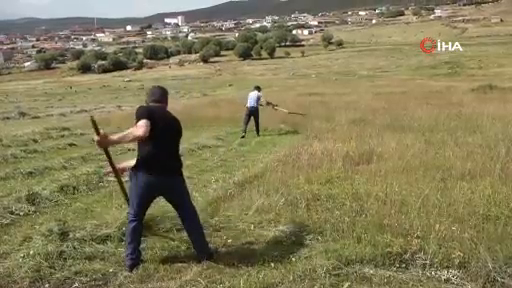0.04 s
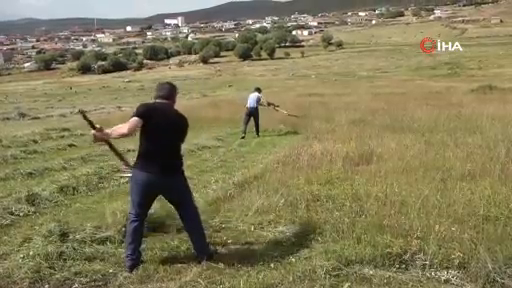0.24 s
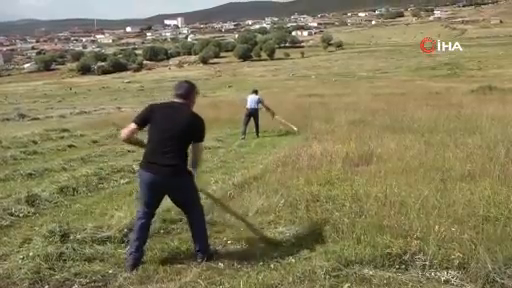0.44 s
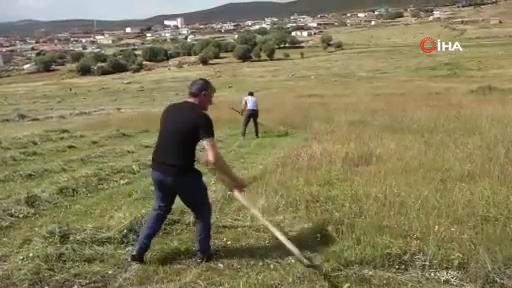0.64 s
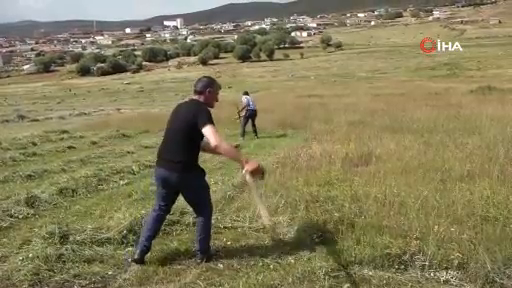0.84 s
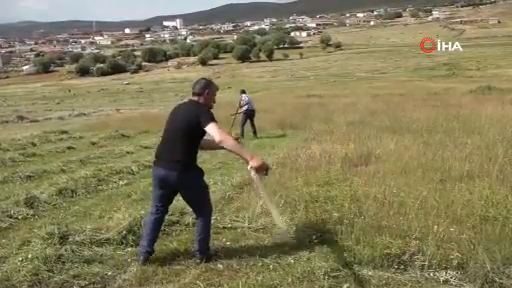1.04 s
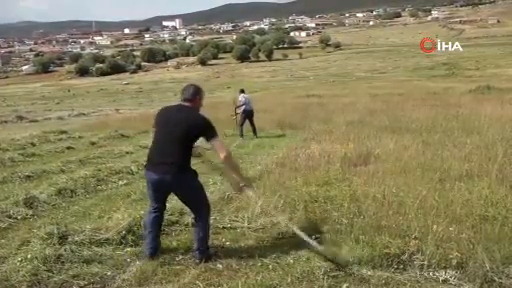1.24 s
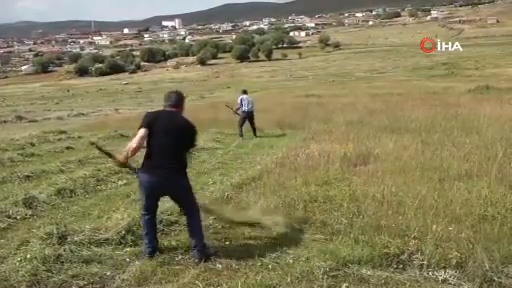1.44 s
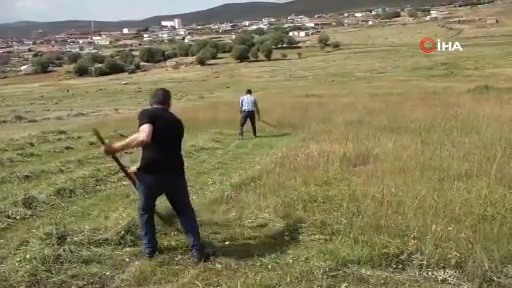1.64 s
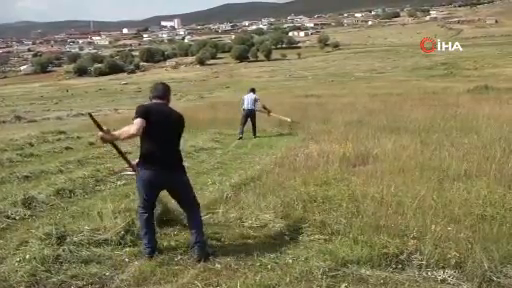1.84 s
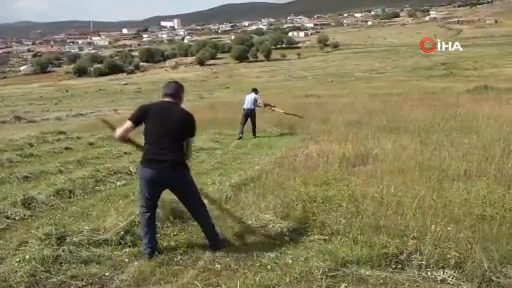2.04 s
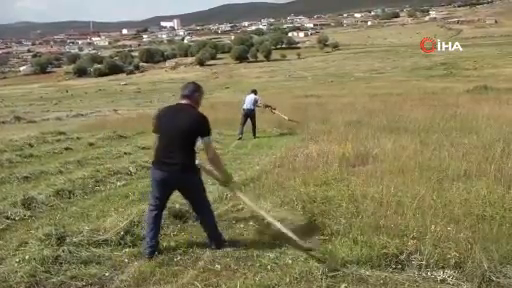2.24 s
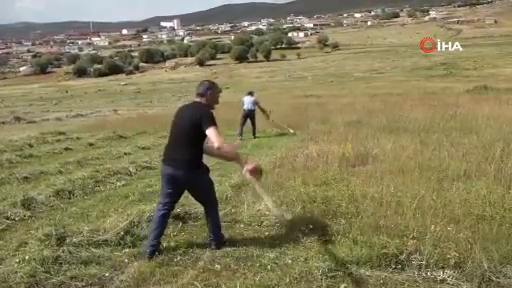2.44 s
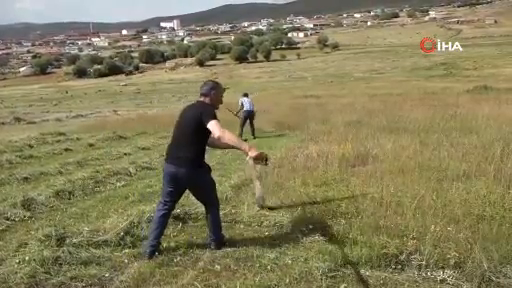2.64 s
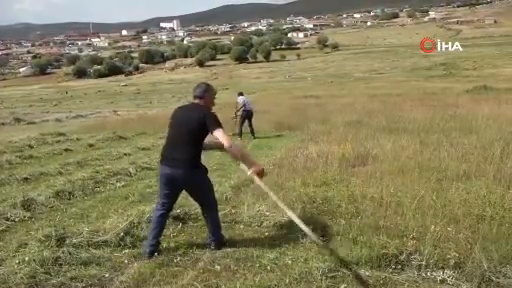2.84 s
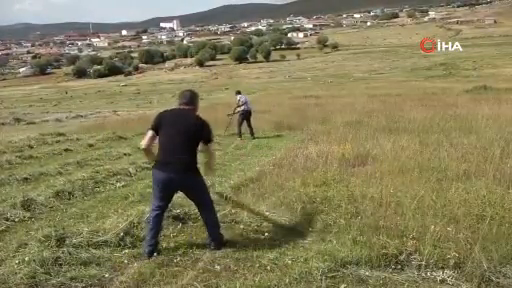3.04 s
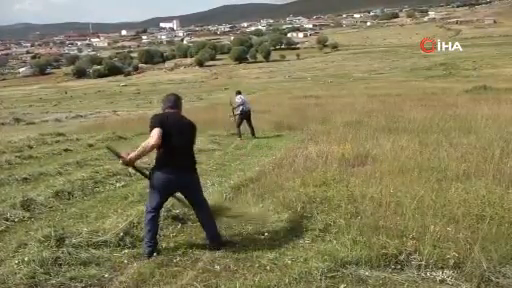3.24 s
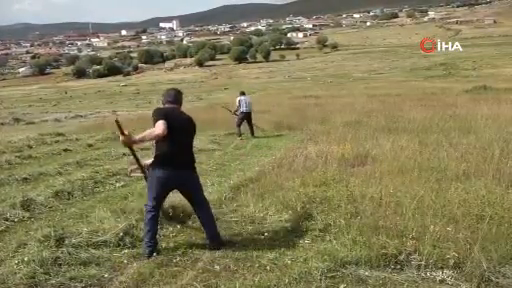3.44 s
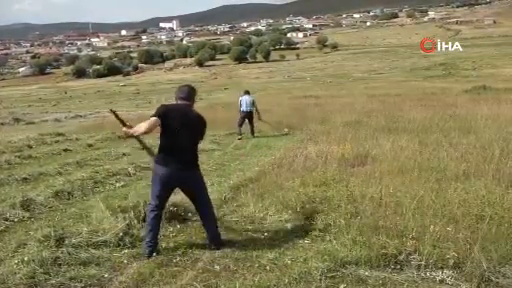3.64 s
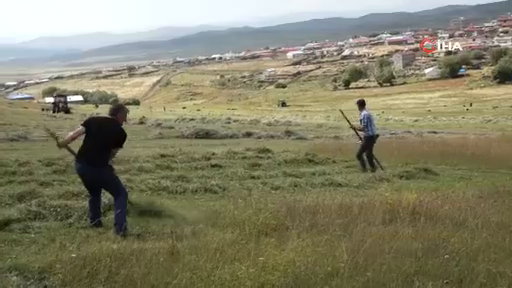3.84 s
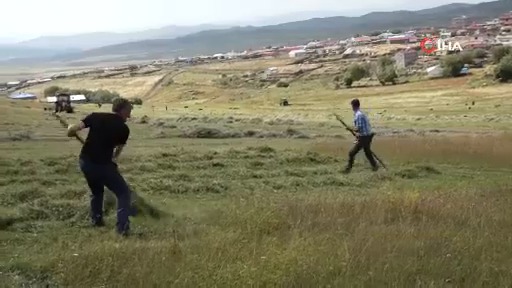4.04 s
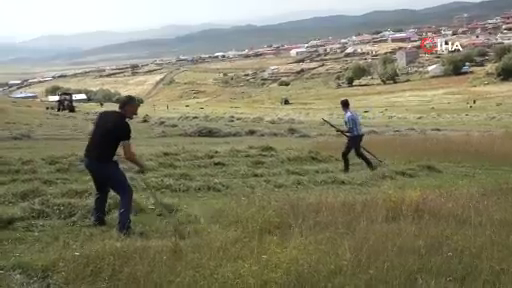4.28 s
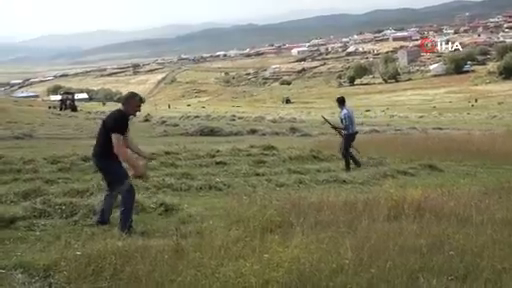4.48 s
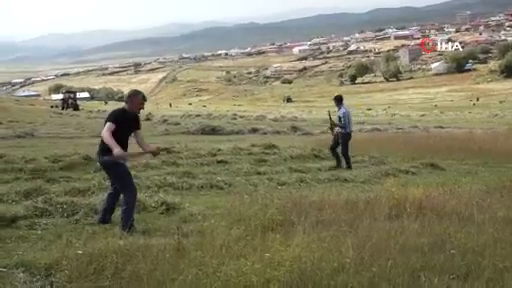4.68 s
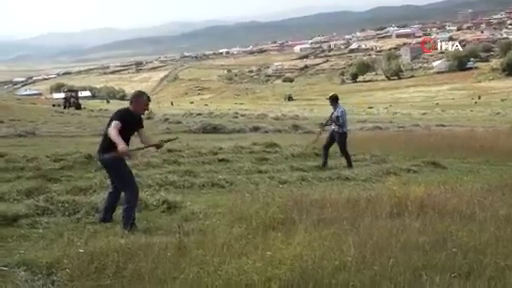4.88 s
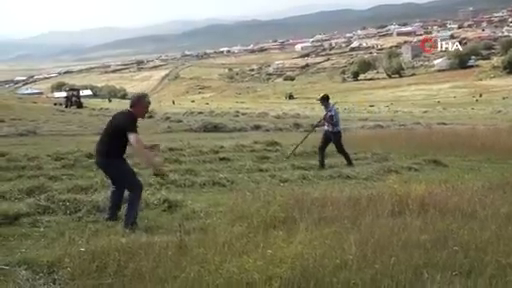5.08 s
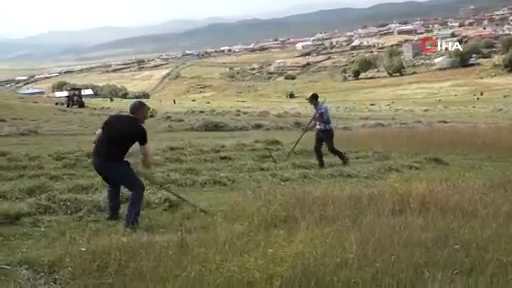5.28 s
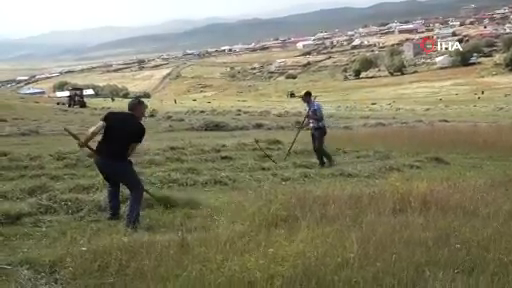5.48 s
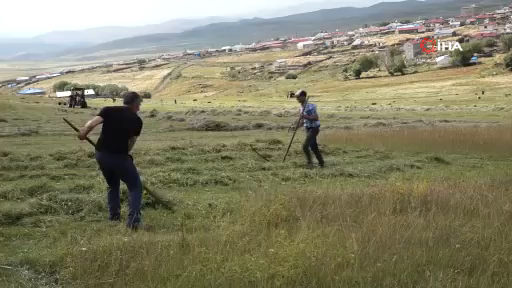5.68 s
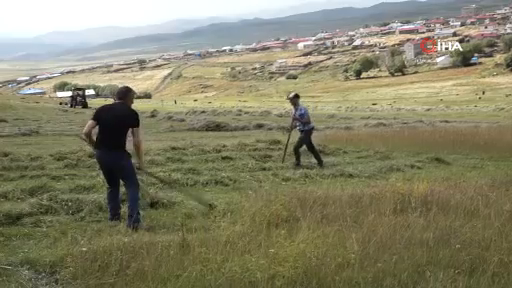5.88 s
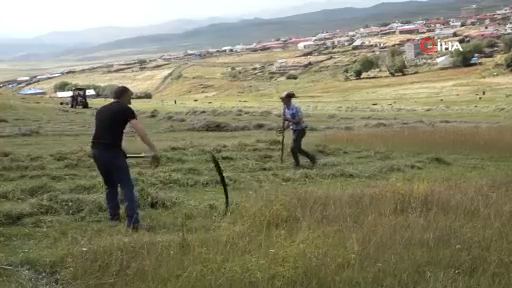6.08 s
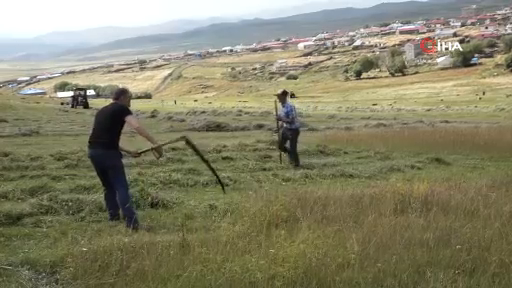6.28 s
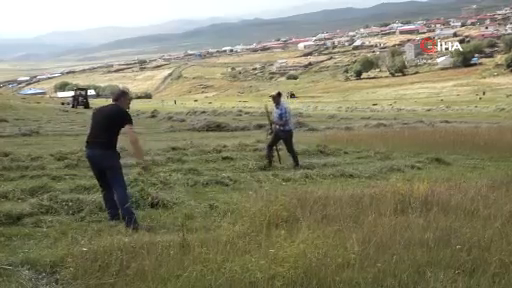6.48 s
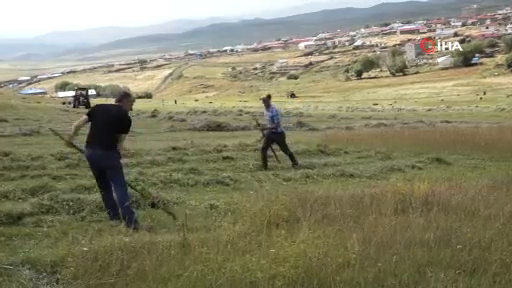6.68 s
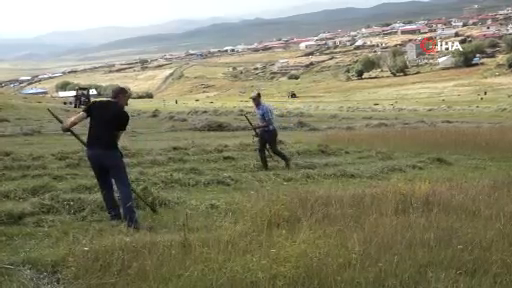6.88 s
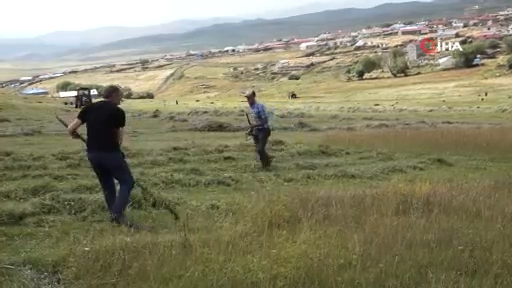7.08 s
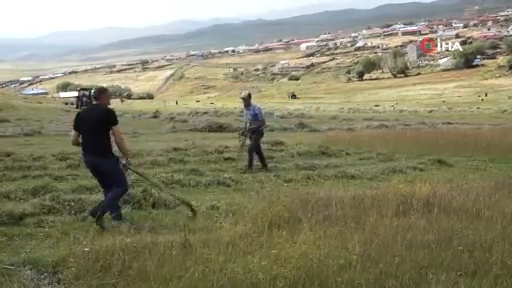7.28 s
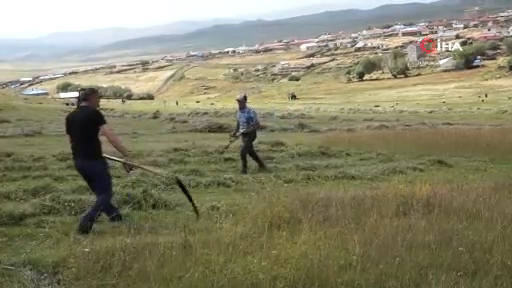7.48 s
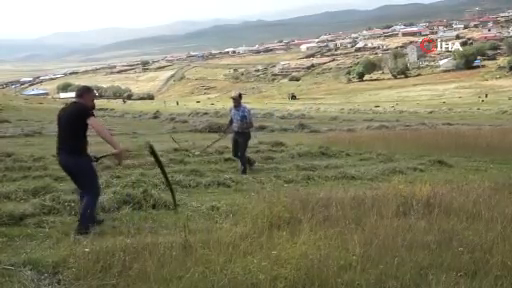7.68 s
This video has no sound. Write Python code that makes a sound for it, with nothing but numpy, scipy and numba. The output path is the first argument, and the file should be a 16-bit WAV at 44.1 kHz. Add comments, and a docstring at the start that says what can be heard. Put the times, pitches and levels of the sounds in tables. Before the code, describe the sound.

Crisp, hissing scythe strokes cut grass a few metres away while a far-off tractor engine chugs steadily.

```python
"""Scythes in a meadow

Two mowers cut dry grass a few metres away. Stems hiss and snap at the blade, the cut swath slumps,
the steel rings faintly and a brief squeak falls at the end. A tractor throbs far down the slope and
light wind buffets the microphone. Midway the listener takes a new stand."""
import sys
import numpy as np
from scipy import signal
from scipy.fft import rfft, irfft
from scipy.io import wavfile
from scipy.ndimage import uniform_filter1d
from numba import njit

SR = 44100
rng = np.random.default_rng(int(sys.argv[2]) if len(sys.argv) > 2 else 0)


def unload_audio(sound):
    """Save the sound as a 16-bit wav file, at the path given as the first command line argument."""
    columns = np.transpose(np.atleast_2d(sound))
    # keep every value between -1 and 1, then stretch to whole-number steps
    steps = np.round(np.clip(columns, -1, 1) * 32767)
    wavfile.write(sys.argv[1], SR, steps.astype(np.int16))


N = 340452
T = np.arange(N) / SR
NEW_STAND_S = 3.775
BITE_FALL_S, TRAIL_FALL_S = 0.12, 0.18  # time to fall 20 dB
BITE_BEND = 1.43  # exponent that rounds the top of the rise

# Spectra of the background hiss, breeze and grass rustle as heard, with the highest treble cut away.
# Each row: frequency in Hz, relative spectral density in dB.
BACKGROUND_SPECTRUM = [(120, -15.5), (200, -7), (307, -38), (490, -10), (653, -20.5), (767, -12),
                       (918, -17), (1460, -18.5), (1750, -25.5), (2500, -24), (5710, -25), (8000, -30),
                       (11900, -32.5), (13000, -57), (14500, -84)]
BREEZE_SPECTRUM = [(8.8, -30), (15, -4), (107, -5), (201, -11), (304, -27.5), (400, -20.5), (520, -72)]
RUSTLE_SPECTRUM = [(1500, -12), (1900, -11), (2570, -3.5), (3000, -4), (5000, 2), (6600, 4), (8400, 4),
                   (11000, -1), (13000, -8.5), (15000, -49)]
# Gusts on the microphone. Each row: start in seconds, hold in seconds, level in dB, centre in Hz.
WIND_GUSTS = [(0.82, 0.049, -40.5, 91), (0.96, .06, -36.5, 65.6), (1.076, 0.021, -35.5, 68.5),
              (1.194, .02, -50, 58.7), (1.275, 0.011, -36, 44.7), (1.304, 0.023, -39.5, 71),
              (1.6, 0.07, -44.5, 50.4), (2.148, 0.022, -45, 50), (6.747, 0.26, -39, 104),
              (7.12, 0.025, -40.5, 130), (7.352, 0.018, -43, 115.9), (7.578, 0.095, -41.5, 136)]
# The engine's course. Each row: time in seconds, firing rate in Hz, exhaust gain in dB, clatter in dB.
ENGINE_COURSE = [(0, 34, -50.5, -72), (2, 33.57, -47.5, -66.5), (3.76, 33.97, -50, -63.5),
                 (3.8, 31.03, -48, -67), (4.35, 31.1, -47, -56), (4.65, 30.39, -47, -55.5),
                 (5.15, 31.46, -46.5, -55), (5.95, 31.58, -47.5, -56), (6.5, 31.93, -45, -56),
                 (6.8, 32.61, -51, -56.5), (7.72, 32.56, -44.5, -63)]
# Exhaust harmonics. Each row: multiple of the firing rate, gain in dB at the first stand, at the second.
EXHAUST_HARMONICS = [(1, 2.5, -1), (2, -15, 1.5), (3, 1, 3), (4, -22, 0.5), (5, -7.5, -11.5),
                     (6, -11.5, -14), (7, -15.5, -42), (8, -18.5, -19.5)]
# Resonances of the tractor's bonnet, the blade, the swath and the microphone's housing.
# Each row: frequency in Hz, bandwidth in Hz, gain in dB.
BONNET_MODES = [(490, 170, -1.5), (821, 99, 2), (1342, 130, 3.5), (2000, 370, 2), (2495, 480, 5),
                (3340, 520, 2.5), (4300, 900, 1)]
BLADE_MODES = [(2120, 400, 4.5), (2580, 620, 2), (3000, 360, 3.5), (4500, 1800, 10.5)]
SWATH_BANDS = [(505, 304, 8), (810, 324, 7), (1130, 240, -1.5)]
HOUSING_MODES = [(3110, 180, -14), (4500, 490, -13), (5790, 250, -10), (6500, 270, -8.5), (8280, 285, -4.5)]
# The squeak's glide. Each row: time in seconds, fundamental in Hz, gain in dB.
SQUEAK_GLIDE = [(7.674, 594, -83), (7.68, 573, -50), (7.692, 530, -63), (7.705, 424, -51), (7.72, 392, -59)]
# The blade dragging over stubble. Each row: start in seconds, length in seconds, level in dB,
# band centre in Hz at the start and at the end.
BLADE_DRAGS = [(0.768, 0.05, -45, 4500, 3500), (0.782, 0.087, -46.5, 3220, 1600),
               (1.358, 0.25, -43, 4120, 1650), (1.38, 0.19, -31.5, 9200, 6900),
               (1.407, 0.04, -37, 4500, 2700), (1.508, 0.032, -33.5, 5500, 2700),
               (1.564, 0.09, -45, 1870, 690), (2.72, 0.07, -42.5, 4500, 2000),
               (3.015, 0.29, -42, 3600, 2170), (3.09, 0.024, -38, 4230, 3100),
               (3.1, 0.13, -32.5, 9300, 7100), (3.174, 0.084, -45, 2100, 1700),
               (3.195, 0.071, -35, 5500, 3700), (3.776, 0.045, -49, 3000, 3100),
               (5.3, 0.22, -43, 4030, 3000), (5.561, 0.076, -48, 4800, 4900),
               (6.736, 0.08, -50, 4200, 2700)]
# Single stems breaking. Each row: start in seconds, peak in dB, centre in Hz.
STEM_SNAPS = [(0.394, -22.5, 9100), (0.674, -30, 8370), (0.7, -34, 8200), (0.748, -23.5, 5620),
              (0.8823, -27, 6500), (1.416, -28, 4150), (1.4547, -15, 7500), (1.494, -18, 6560),
              (1.497, -13.5, 6000), (1.5, -19, 5570), (1.502, -27, 6510), (2.285, -23.5, 6500),
              (2.3381, -28, 10300), (2.4851, -29, 7200), (2.5527, -32, 8000), (2.6626, -29, 6000),
              (3.1032, -26, 4500), (3.1552, -21, 6500), (3.239, -27, 4800), (3.7885, -36, 6000),
              (5.26, -24, 6890), (5.3385, -27, 7190), (5.511, -28, 6200), (6.748, -33, 5500),
              (6.792, -30.5, 4300), (6.831, -35, 4830)]
# Back swings, far cuts and feet. Each row: start in seconds, hold in seconds, level in dB,
# rise and fall in seconds per 20 dB, spectral tilt in dB per octave.
LIGHT_RUSTLES = [(0, 0.069, -37.5, 0.046, 0.17, 3.5), (.332, .005, -41.5, 0.091, 0.058, 5),
                 (.398, .003, -37.5, 0.041, 0.019, 6), (.43, 0.27, -41, 0.11, 0.24, 2.5),
                 (.77, 0.04, -40.5, 0.04, 0.2, 0), (.85, 0.041, -39.5, 0.12, 0.12, 2.5),
                 (1.0, 0.16, -56, .1, 0.26, 3), (2.04, 0.25, -48, 0.21, .1, 3.5),
                 (2.23, 0.098, -41, 0.21, 0.088, 2.5), (2.489, 0.0039, -48, 0.0073, 0.11, -3),
                 (2.551, .004, -40, 0.014, 0.021, 2.5), (2.57, 0.052, -53.5, 0.23, 0.26, 14),
                 (2.73, 0.026, -41.5, 0.31, 0.28, -1.5), (3.63, 0.077, -46, 0.2, 0.33, 2),
                 (3.79, .005, -37.5, 0.015, 0.096, 0), (3.85, 0.056, -47, .05, 0.23, 0),
                 (4.36, 0.039, -50.5, 0.69, 0.37, 3), (4.45, .005, -45, 0.16, 0.14, -0.5),
                 (4.62, 0.53, -56, 0.13, 0.097, -12), (5.87, 0.01, -53, 0.6, 0.32, -1.5),
                 (6.09, .005, -51.5, 0.12, 0.046, -4), (6.4, 0.16, -59.5, 0.055, 0.16, -10),
                 (6.74, 0.068, -42, 0.014, 0.062, -1), (6.86, .02, -47.5, 0.055, 0.1, 2),
                 (7.13, 0.0049, -51, 0.23, 0.14, 1), (7.34, 0.012, -55.5, 0.28, 0.034, -4)]
# Full strokes. Each row: the bite's start and hold in seconds, level and change along the hold in dB,
# and last 20 dB of rise in seconds; the follow-through's hold in seconds and level in dB;
# the swath's start and hold in seconds, level and change along the hold in dB.
STROKES = [(1.375, 0.15, -29.5, -2.5, 0.051, 0.18, -31.5, 1.5, 0.14, -42, -3),
           (3.094, 0.14, -29.5, -1, 0.098, 0.23, -35, 3.168, .21, -43, -6.5),
           (5.268, .11, -38.5, 5.5, 0.12, 0.19, -34.5, 5.33, 0.14, -48.5, -5.5)]


def undb(db):
    """Amplitude ratio of a level in dB."""
    return 10 ** (np.asarray(db) / 20)


def level(x, db):
    """Scaling to an rms level in dB."""
    return x * undb(db) / np.sqrt(np.mean(x ** 2))


def curves(table):
    """Linear interpolation of each column over the times in the first."""
    times, *columns = np.transpose(table)
    return [np.interp(T, times, column) for column in columns]


def spectrum_db(points, hz):
    """Interpolation of a spectrum on a logarithmic frequency axis."""
    freqs, db = np.transpose(points)
    return np.interp(np.log(hz), np.log(freqs), db)


@njit
def state_variable(x, tuning, damping):
    """Two integrators in a loop form a damped resonator with unit gain at its centre."""
    y, band, low = np.empty(len(x)), 0., 0.
    for i in range(len(x)):
        g = tuning[i]
        v = (band + g * (x[i] + 1e-18 - low)) / (1 + g * (g + damping))
        band, low, y[i] = 2 * v - band, low + 2 * g * v, damping * v
    return y


def bandpass(x, hz, width, stages=1):
    """Resonators in cascade; the centre may glide, and each stage's width is a fraction of it."""
    tuning = np.tan(np.pi * hz / SR) + np.zeros(len(x))
    for _ in range(stages):
        x = state_variable(1. * x, tuning, 1. * width)
    return x


def ring(x, modes):
    """Superposition of modes, each filtered twice to deepen the valleys between them."""
    return sum(undb(db) * bandpass(bandpass(x, hz, width / hz), hz, 1.5 * width / hz) / np.sqrt(width)
               for hz, width, db in modes)


def coloured_noise(points):
    """White noise weighted by a spectrum; rms 1."""
    hz = np.maximum(np.fft.rfftfreq(N, 1 / SR), 1)
    return level(irfft(rfft(rng.standard_normal(N)) * undb(spectrum_db(points, hz)), N), 0)


def waver(rate):
    """Random modulation: rate steps a second, smoothed twice; spread near 1."""
    span = int(SR / rate)
    steps = np.repeat(rng.standard_normal(N // span + 1), span)
    return 1.3 * uniform_filter1d(uniform_filter1d(steps, span), span)[:N]


def crackle(rate, spread_db):
    """Shot noise: on average rate impulses a second, of uneven size; rms 1."""
    hits = (rng.random(N) < rate / SR) * rng.standard_normal(N)
    return level(hits * undb(spread_db * np.minimum(rng.exponential(size=N), 3)), 0)


def swell(start, hold, db, rise, fall, change_db=0, bend=1):
    """Power envelope that reaches db at start, holds, then decays; rise and fall each span 20 dB."""
    along = np.clip((T - start) / max(hold, 1e-3), 0, 1)
    rise_db = 20 * (np.maximum(start - T, 0) / rise) ** bend
    fall_db = 20 * np.maximum(T - start - hold, 0) / fall
    return undb(2 * (db + change_db * along - rise_db - fall_db))


def stereo(mid, side, side_db):
    """Sum and difference give the left and right channels."""
    return mid + undb(side_db) * side * np.array([[1], [-1]])


def meadow():
    """The distant background hiss is broadband noise, partly correlated between the channels."""
    db = np.where(T > NEW_STAND_S, -54.5, -56) + 0.7 * waver(2.64)
    mid, side = (coloured_noise(BACKGROUND_SPECTRUM) for _ in range(2))
    return undb(db) * stereo(mid, side, -10.5)


def wind(breeze_db=-48.5, lull_db=-51.5, lull_hz=104):
    """Turbulence presses almost equally on both microphone ports; each gust has its own low band."""
    gusts = [(swell(start, hold, db, rise=0.12, fall=0.19), hz) for start, hold, db, hz in WIND_GUSTS]
    gusts.append((undb(2 * lull_db), lull_hz))
    power = sum(p for p, _ in gusts)
    centre = sum(p * hz for p, hz in gusts) / power
    eddies = bandpass(rng.standard_normal(N), centre, 1.58, stages=3) / np.sqrt(centre)
    breeze = undb(breeze_db + 0.49 * waver(8.6)) * coloured_noise(BREEZE_SPECTRUM)
    buffeting = np.sqrt(power) * undb(1.1 * waver(30)) * level(eddies, 0)
    side = level(bandpass(rng.standard_normal(N), 135, 0.84), 0)
    return stereo(breeze + buffeting, side, -69.5)


def tractor(firing_s=3.795, lead_cycles=.13, gap_cycles=.17, scatter_db=2.5):
    """Periodic firing gives exhaust harmonics and twice a cycle knocks the bonnet into resonance."""
    hz, exhaust_db, clatter_db = curves(ENGINE_COURSE)
    cycles = np.cumsum(hz) / SR
    cycles -= cycles[int(firing_s * SR)]
    exhaust = 0
    for k, first_db, second_db in EXHAUST_HARMONICS:  # level and phase waver over the distance
        gain = undb(np.where(T > NEW_STAND_S, second_db, first_db) + 1.05 * waver(13))
        exhaust += gain * np.cos(2 * np.pi * k * cycles + 0.77 * waver(5.7))
    firing, since = np.divmod(cycles + lead_cycles, 1)
    second_knock = .6 * (since > gap_cycles) * np.exp(-(since - gap_cycles) / .2)
    knocks = .3 + np.exp(-since / .15) + second_knock
    tick = 11 * (np.diff(since, prepend=0) < 0)  # the first knock starts sharply
    strengths = undb(scatter_db * rng.uniform(-1, 1, (N // 1000, len(BONNET_MODES))))
    blows = strengths[(firing - firing[0]).astype(int)].T  # one strength per panel and firing
    mid = sum(ring(blow * (tick + knocks * rng.standard_normal(N)), [panel])
              for blow, panel in zip(blows, BONNET_MODES))
    side = ring(knocks * rng.standard_normal(N), BONNET_MODES)
    return undb(exhaust_db) * exhaust + undb(clatter_db) * stereo(level(mid, 0), level(side, 0), -14)


def squeak(formant_hz=2200, width_hz=520):
    """A falling harmonic series passes through one fixed formant."""
    hz, db = curves(SQUEAK_GLIDE)
    phase = 2 * np.pi * np.cumsum(hz) / SR
    tone = sum(np.sin(k * phase) * np.exp(-((k * hz - formant_hz) / width_hz) ** 2) for k in range(2, 9))
    return (T > SQUEAK_GLIDE[0][0]) * undb(db) * tone


def blade_scrapes():
    """Friction on stubble drives the damped steel's broad modes, mostly lower as the contact slides."""
    stubble = crackle(rate=2800, spread_db=-5)
    grit = level(ring(stubble, BLADE_MODES), 0) + 3 * stubble
    out = np.zeros(N)
    for start, length, db, hz_from, hz_to in BLADE_DRAGS:
        at, along = int(start * SR), np.arange(0, 1, 1 / (length * SR))
        centre = hz_from * (hz_to / hz_from) ** along
        drag = bandpass(grit[at:at + len(along)], centre, 0.63, stages=2)
        out[at:at + len(along)] += np.sin(np.pi * along ** .8) * level(drag, db)
    return out


def blade_ping(start=.546, hz=3080, db=-46.5, t60_s=.5):
    """A tap sets one mode of the steel in free, exponentially decaying vibration."""
    age = np.maximum(T - start, 0)
    ringing = (age > 0) & (age < .068)  # grass stops the ring
    envelope = ringing * undb(db - 60 * age / t60_s + 4 * waver(150))
    return envelope * np.sin(2 * np.pi * hz * age + waver(120))


def swath():
    """Cut grass carried by the stroke radiates coarse, dull noise in three broad bands."""
    power = sum(swell(start, hold, db, rise=0.2, fall=0.1, change_db=sag_db)
                for *_, start, hold, db, sag_db in STROKES)
    grains = [rng.standard_normal(N) + 0.64 * crackle(rate=400, spread_db=0) for _ in range(2)]
    mid, side = (level(ring(x, SWATH_BANDS), 0) for x in grains)
    return np.sqrt(power) * stereo(mid, side, -14.5)


def snaps():
    """Brittle fracture of a stem gives a band-limited impulse with a short rustling tail."""
    out, t = np.zeros(N), np.arange(900) / SR
    for start, db, hz in STEM_SNAPS:
        tail = 0.24 * rng.standard_normal(len(t)) * np.exp(-t / 0.0059)
        burst = bandpass((t == 0) + tail, hz, 1.5, stages=3)
        at = int(start * SR)
        out[at:at + len(t)] += undb(db) * burst / np.abs(burst).max()
    return out


def sizzle(lead_s=0.014, cutoff_hz=10500):
    """The finest stems leave the edge first and radiate the highest frequencies of each bite."""
    power = sum(swell(start - lead_s, hold, db - 2.5, rise, TRAIL_FALL_S, bend=BITE_BEND)
                for start, hold, db, _, rise, *_ in STROKES)
    highpass = signal.butter(2, cutoff_hz, "high", fs=SR, output="sos")
    hiss = signal.sosfilt(highpass, rng.standard_normal(N))
    return np.sqrt(power) * undb(1.5 * waver(41.3)) * hiss


def brushing(trail_tilt=2.3):
    """Incoherent sources add in power: the amplitude and mean tilt (dB per octave) of moving stems."""
    parts = [(swell(*envelope), tilt) for *envelope, tilt in LIGHT_RUSTLES]
    for start, hold, db, change_db, rise, trail_s, trail_db, *_ in STROKES:
        bite = swell(start, hold, db, rise, BITE_FALL_S, change_db, BITE_BEND)
        bite_tilt = 1.26 - 6 * np.clip((T - start) / hold, -0.4, 1)  # dulls along the bite
        trail = swell(start + hold, trail_s, trail_db, BITE_FALL_S, TRAIL_FALL_S, change_db=-7)
        parts += [(bite, bite_tilt), (trail, trail_tilt)]
    power = sum(p for p, _ in parts) + 1e-12
    return np.sqrt(power), sum(p * tilt for p, tilt in parts) / power


def grass():
    """Thousands of fractures superpose on a brushing hiss; broad cracks span all bands, fine ones one."""
    amplitude, tilt = brushing()
    broad_cracks, surge_db = crackle(rate=800, spread_db=2.8), waver(30)
    difference = rng.standard_normal(N) + 0.8 * crackle(rate=700, spread_db=3.5)
    out, power = 0, 0
    for hz in 1850 * 2 ** (np.arange(10) / 3):  # third-octave bands
        stems = rng.standard_normal(N) + 0.85 * broad_cracks + 0.55 * crackle(rate=1400, spread_db=3.5)
        mid, side = (level(bandpass(x, hz, .4, stages=2), 0) for x in (stems, difference))
        gain = undb(spectrum_db(RUSTLE_SPECTRUM, hz) + tilt * np.log2(hz / 6500)) * np.sqrt(hz)
        out += gain * undb(surge_db + 2 * waver(25)) * stereo(mid, side, -12)
        power += gain ** 2
    return out * amplitude / np.sqrt(power)


def scene():
    """The pressures of all sources add by linear superposition."""
    mowing = grass() + sizzle() + swath() + snaps() + blade_scrapes() + blade_ping()
    return mowing + squeak() + tractor() + wind() + meadow()


def record(dry, right_treble_db=1.4, top_hz=15050):
    """Housing resonances colour the sound, the left port is slightly duller and a low-pass cuts the top."""
    housed = np.array([x + sum(undb(db) * bandpass(x, hz, width / hz) for hz, width, db in HOUSING_MODES)
                       for x in dry])
    treble = signal.sosfilt(signal.butter(1, 700, "high", fs=SR, output="sos"), housed)
    balance = undb(np.array([[-right_treble_db], [right_treble_db]]) / 2)
    ports = housed + (balance - 1) * treble
    return signal.sosfilt(signal.ellip(14, .2, 80, top_hz, fs=SR, output="sos"), ports)


dry = scene()
out = record(dry)
unload_audio(out)
```